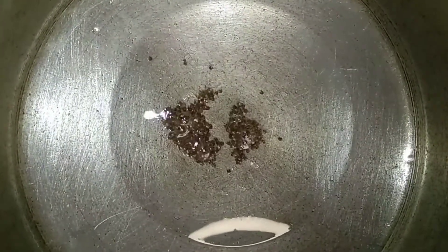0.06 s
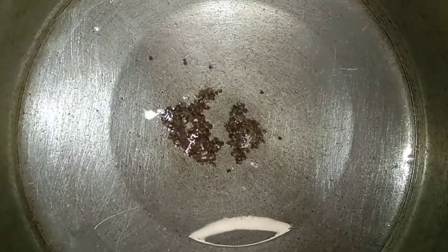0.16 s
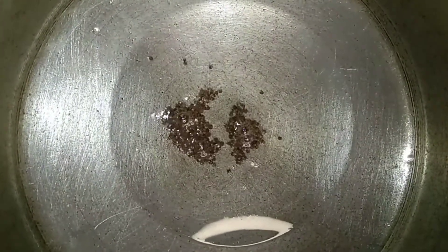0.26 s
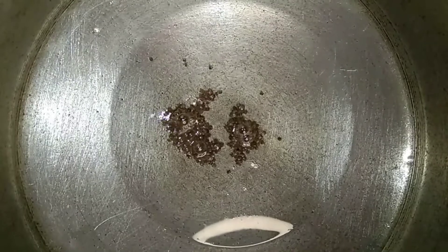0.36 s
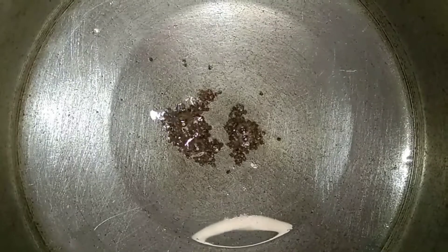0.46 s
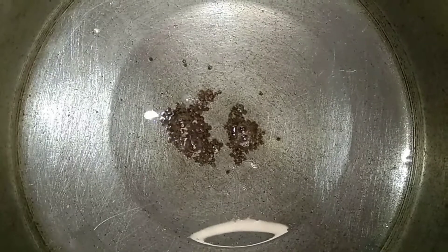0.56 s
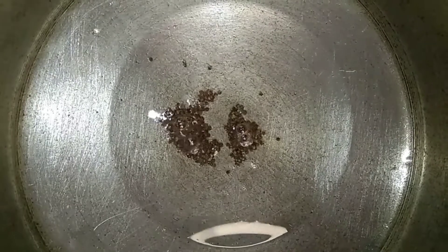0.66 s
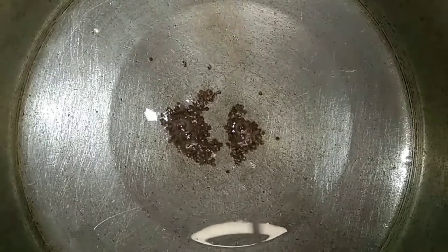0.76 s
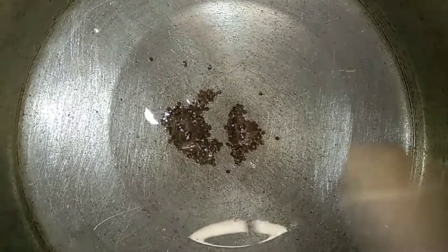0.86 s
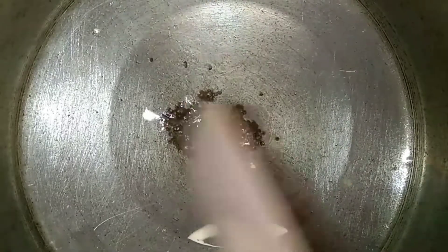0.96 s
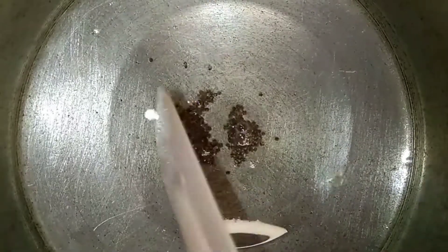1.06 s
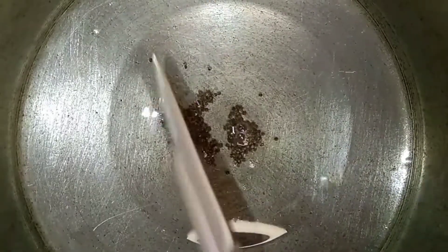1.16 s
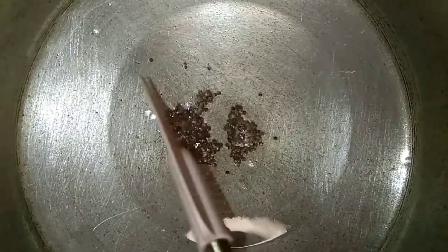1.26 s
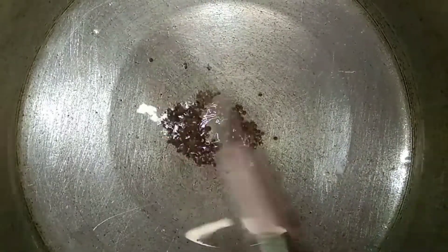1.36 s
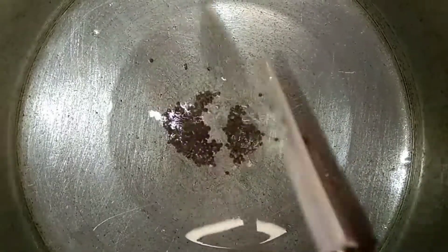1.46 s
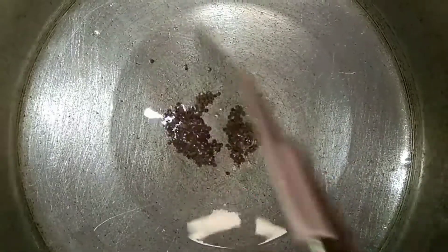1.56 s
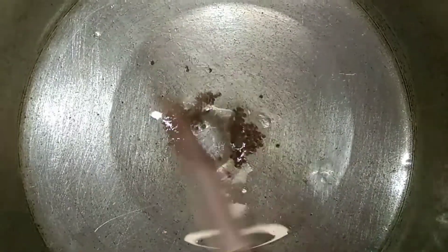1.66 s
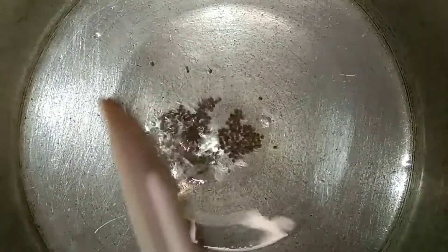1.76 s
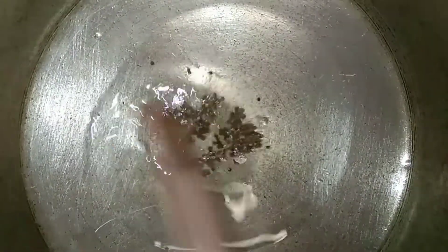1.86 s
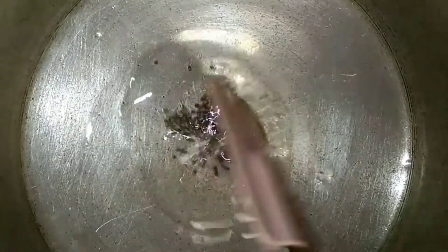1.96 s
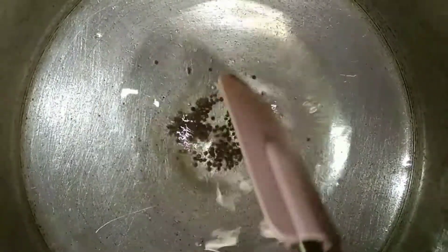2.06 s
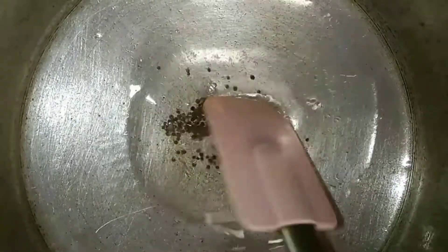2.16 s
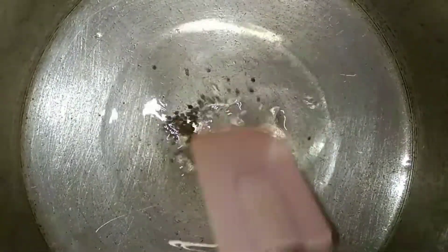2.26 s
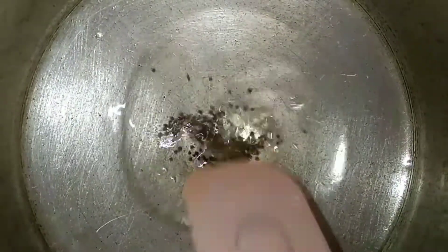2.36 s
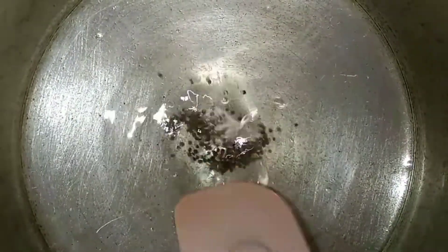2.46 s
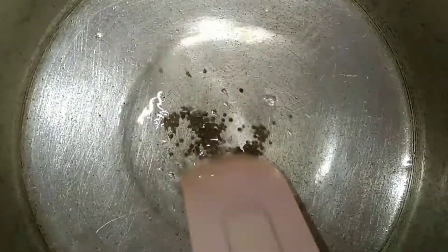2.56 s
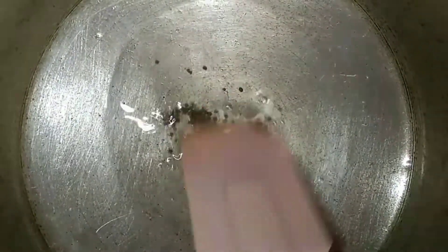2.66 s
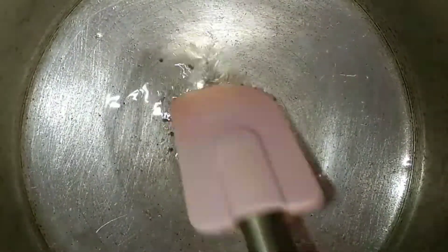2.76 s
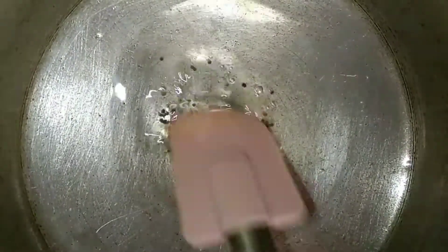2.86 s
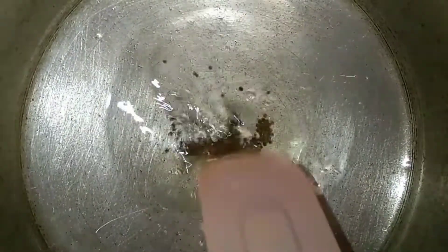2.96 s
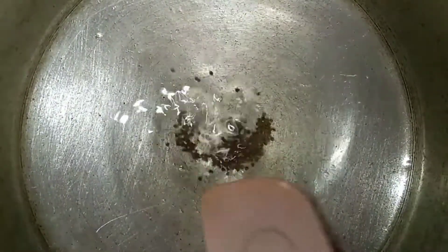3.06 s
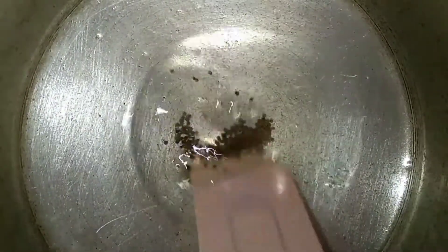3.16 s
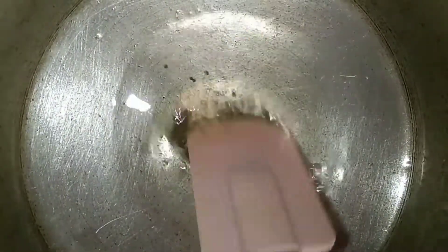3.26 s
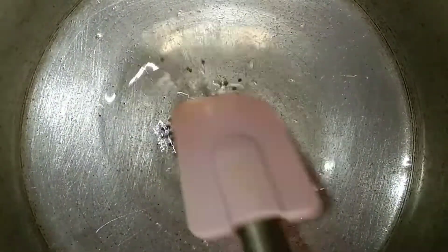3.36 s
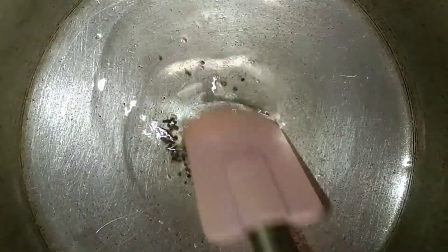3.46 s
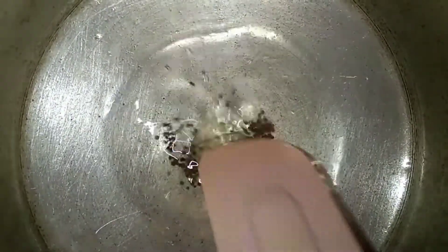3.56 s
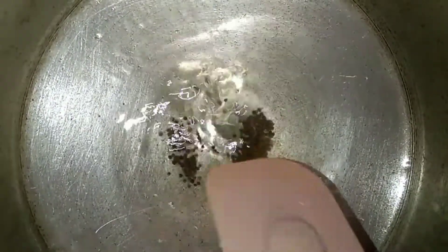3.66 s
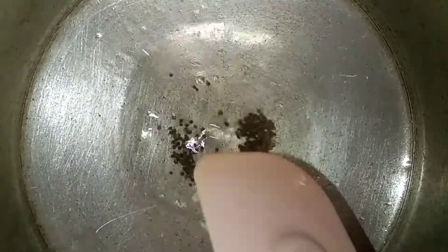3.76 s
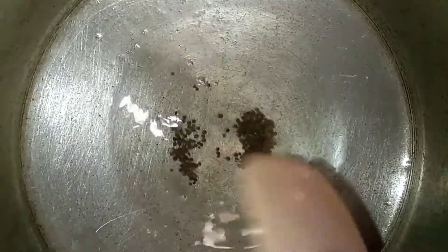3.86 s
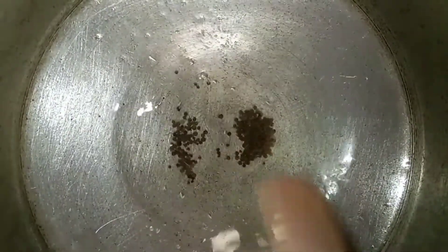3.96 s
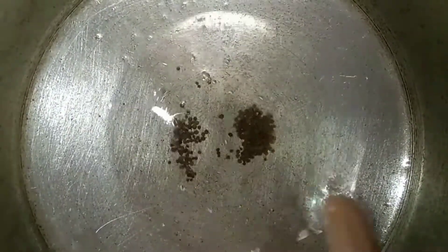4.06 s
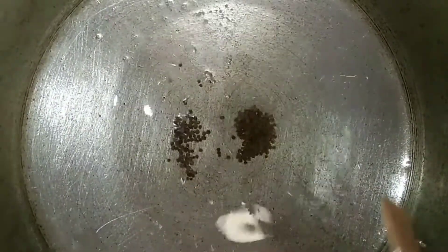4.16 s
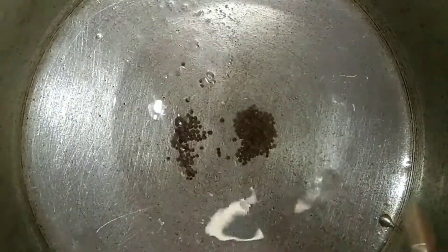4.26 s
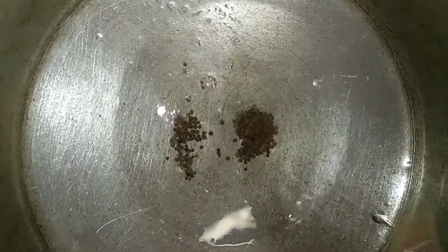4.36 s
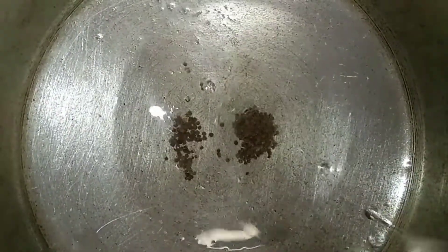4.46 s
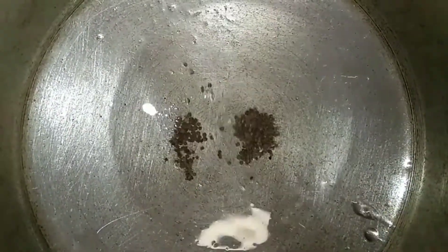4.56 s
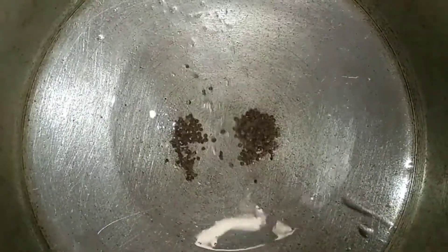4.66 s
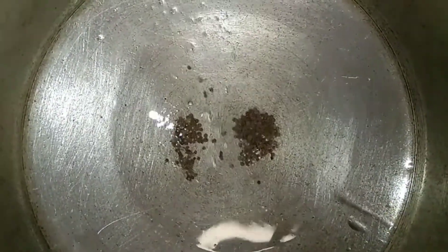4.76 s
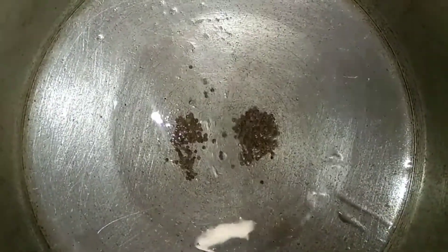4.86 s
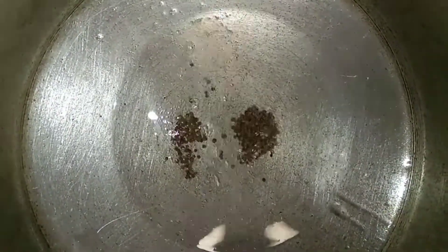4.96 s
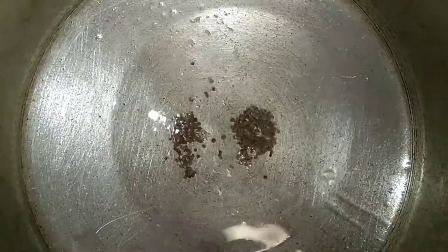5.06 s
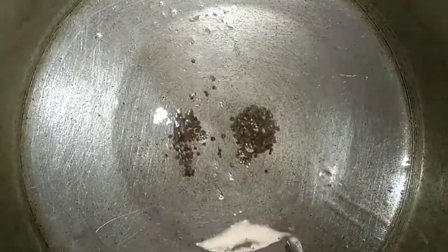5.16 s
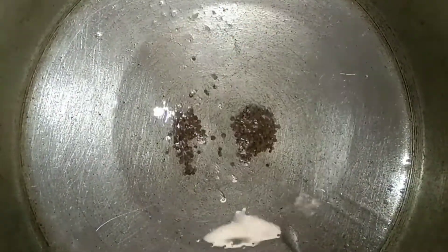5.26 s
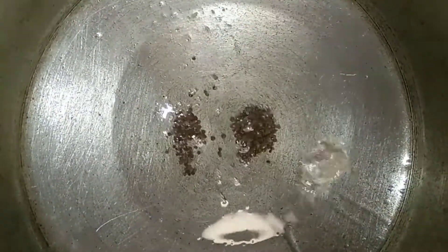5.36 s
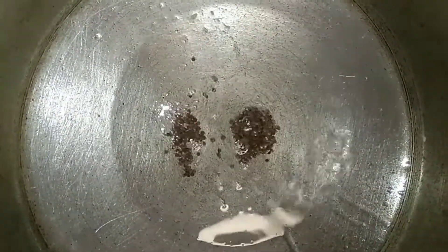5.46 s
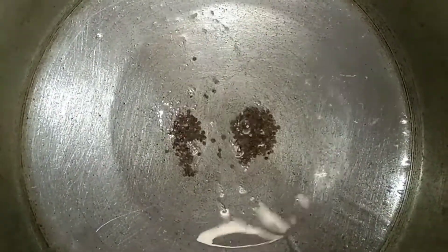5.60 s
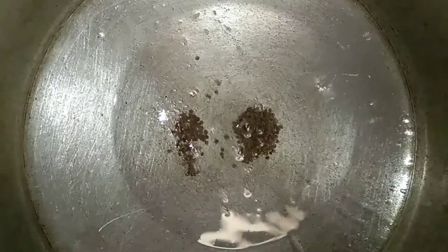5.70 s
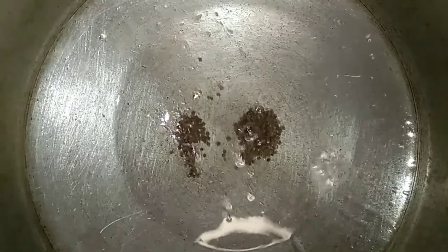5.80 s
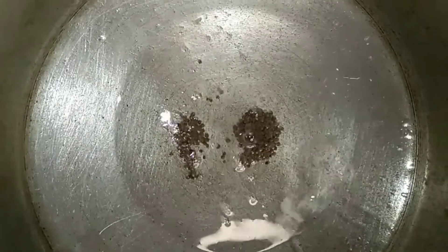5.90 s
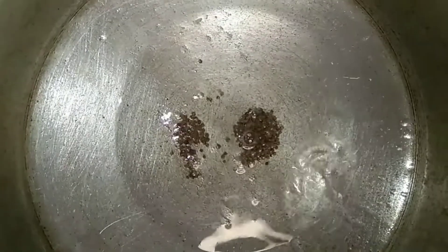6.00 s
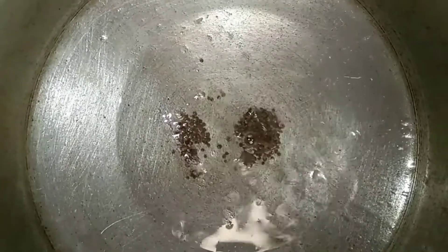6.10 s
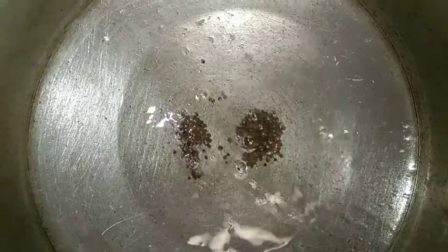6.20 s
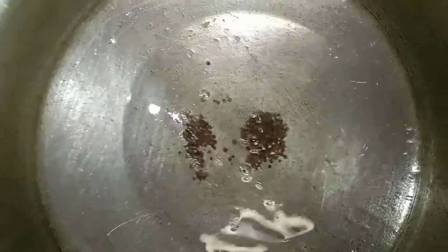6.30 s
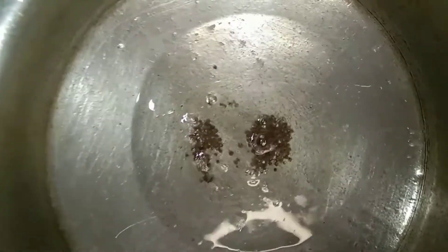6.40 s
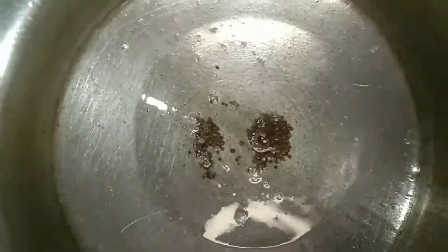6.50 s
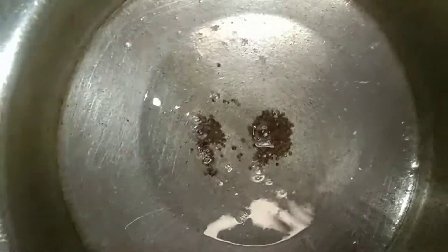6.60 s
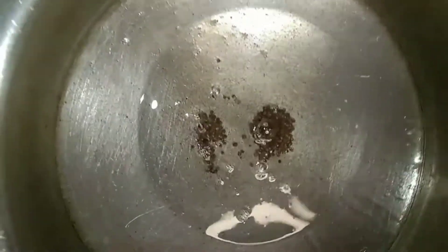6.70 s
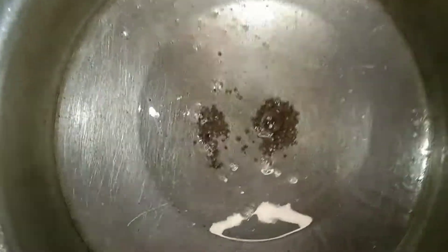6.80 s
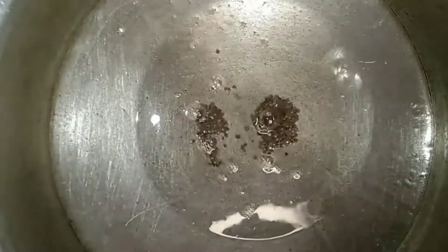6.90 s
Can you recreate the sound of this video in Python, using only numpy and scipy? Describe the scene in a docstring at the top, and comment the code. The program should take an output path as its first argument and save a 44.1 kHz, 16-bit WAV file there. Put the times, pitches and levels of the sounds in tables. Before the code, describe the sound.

Mustard seeds heat in oil in a steel pan, heard close up in a small kitchen. Quiet sizzle and a few faint ticks open, then sharp snaps knock the metal. A soft spatula gives a brief low rumble midway. Snaps strengthen around four seconds, then bubbles blip and pop densely, with one very loud crack near six seconds, above a low, steady stove rush.

```python
"""Mustard seeds heat in a little oil in a steel pan: their coats snap as noise cracks that knock the pan.
Steam bubbles tear the oil film and ring as rising sines; larger pockets plop, low and hollow.
Beneath, a fine sizzle of random spits comes and goes, and blips of tiny bubbles simmer.
A soft spatula adds a little low rumble, over the steady filtered-noise rush of the stove.
The microphone is close to the pan, in a small kitchen."""
import sys
import numpy as np
from scipy import signal
from scipy.fft import rfft, irfft, next_fast_len
from scipy.io import wavfile

SR = 44100
rng = np.random.default_rng(int(sys.argv[2]) if len(sys.argv) > 2 else 0)


def transcribe(u):
    """Save the signal u as a 16-bit wav file named by the first command-line argument.

    u: samples, shape (n,) or (channels, n), limited to [-1, 1]; the rate is SR.
    q: integer samples, one column per channel.
    """
    v = np.clip(np.atleast_2d(u).T, -1, 1)
    q = np.round(v * 32767).astype(np.int16)
    wavfile.write(sys.argv[1], SR, q)


N = 306009
TIME = np.arange(N) / SR  # seconds
AGE = np.arange(SR // 4) / SR  # seconds since the start of one event


def amp(db):
    """Decibels to gain."""
    return 10 ** (np.asarray(db) / 20)


def unit(x):
    """Scaled to rms 1."""
    return x / np.sqrt(np.mean(x ** 2) + 1e-20)


def packet(x):
    """Scaled to energy 1."""
    return x / (np.linalg.norm(x) + 1e-12)


def along(points, hz):
    """(Hz, value) points read on a log frequency axis."""
    point_hz, values = np.transpose(points)
    return np.interp(np.log(hz + 1), np.log(point_hz), values)


def fade(t, t60):
    """Exponential decay, 60 dB in t60 seconds."""
    return np.exp(-np.log(1000) * t / t60)


def coloured(x, spectrum, modes=()):
    """x through a causal minimum-phase filter: a smooth spectrum with resonances and notches on top."""
    size = 2 * next_fast_len(len(x))
    f = np.fft.rfftfreq(size, 1 / SR)
    level_db = along(spectrum, f)
    for hz, width, db in modes:
        level_db = level_db + db / (1 + (2 * (f - hz) / width) ** 2)
    # folding the cepstrum onto positive time makes the filter causal
    cepstrum = irfft(np.log(amp(level_db)))
    cepstrum[1:size // 2] *= 2
    cepstrum[size // 2 + 1:] = 0
    response = np.exp(rfft(cepstrum))
    return irfft(rfft(x, size) * response, size)[:len(x)]


def burst(t60, spray):
    """A sudden crack, one impulse, with a short decaying spray of noise."""
    x = spray * packet(rng.standard_normal(len(AGE)) * fade(AGE, t60))
    x[0] += 1
    return x


def add(track, s, sound):
    """Mix a sound into the track at time s."""
    part = track[max(round(s * SR), 0):][:len(sound)]
    part += sound[:len(part)]


def specks(rate, spread_db):
    """Random impulses of very unequal size, rate per second on average, rms 1."""
    sizes = amp(spread_db * np.minimum(rng.standard_normal(N), 2))
    present = rng.random(N) < rate / SR
    return unit(sizes * present * rng.choice([-1, 1], N))


def scattered(start, end, count):
    """Irregular times, spread over the whole stretch."""
    return start + (np.arange(count) + rng.random(count)) * (end - start) / count


# How long the kitchen rings on. Each row: frequency in Hz, t60 in seconds.
KITCHEN_DECAY = [(300, 0.18), (3000, 0.23), (7000, 0.11), (15000, 0.063)]


def echoes(x, bounce=0.14, bounce_s=.00139, bowl_db=-4, bowl_t60=0.046, room_db=-8):
    """Direct sound, a bounce off the pan's floor, a quick scatter between its walls, then the kitchen."""
    bowl = rng.standard_normal(len(AGE)) * fade(AGE, bowl_t60) * (AGE > bounce_s)
    # kitchen tail: noise whose bands die away at their own rates
    hz, t, bands = signal.stft(rng.standard_normal(len(AGE)), SR, nperseg=256)
    decays = fade(t, along(KITCHEN_DECAY, hz)[:, None])
    room = signal.istft(bands * decays, SR, nperseg=256)[1][:len(AGE)]
    room = room * (AGE > .005)
    response = amp(bowl_db) * packet(bowl) + amp(room_db) * packet(room)
    response[0] += 1
    response += bounce * np.pad(response, (round(bounce_s * SR), 0))[:len(AGE)]
    return signal.fftconvolve(x, packet(response))[:len(x)]


# Tone of the stove's rush. Each row: frequency in Hz, relative density in dB per Hz.
STOVE_SPECTRUM = [(25, -14), (48, 1.5), (80, 2.5), (160, -7.5), (300, -5), (550, -9.5), (1000, -15),
                  (2000, -28), (6500, -34.5), (9000, -46.5), (16000, -44.5)]


def stove(level_db=-53, drone_db=-65, drone_hz=256, width_hz=7):
    """The steady rush of the stove as shaped noise, with a faint wavering drone of narrow-band noise."""
    rush = unit(coloured(rng.standard_normal(N), STOVE_SPECTRUM))
    resonance = signal.iirpeak(drone_hz, drone_hz / width_hz, SR)
    drone = unit(signal.lfilter(*resonance, rng.standard_normal(N)))
    return amp(level_db) * rush + amp(drone_db) * drone


# Strokes of the spatula. Each row: centre in seconds, length in seconds, rumble level in dB.
STROKES = [(3.011, 0.1, -42), (3.326, 0.31, -44)]


def stirring():
    """Low, lumpy rumble that swells and fades with each stroke of the spatula."""
    low = [(25, -32), (50, 1.5), (75, 1.0), (130, -7), (300, -46), (1000, -80)]  # Hz, relative dB
    rumble = unit(coloured(rng.standard_normal(N), low))
    strokes = sum(amp(db) * np.exp(-(2 * (TIME - s) / length) ** 2) for s, length, db in STROKES)
    return rumble * strokes


# Spells in which moisture fries in the oil.
# Each row: time of full strength in seconds, length held in seconds, relative level in dB.
FRYING_SPELLS = [(.88, .47, -60), (1.749, .2, -64), (3.759, .62, -59), (5.54, .9, -54)]
SPELL_ATTACK_S, SPELL_T60_S = 0.052, .7  # rise before full strength, release after the hold
IDLE_DB = -80.5  # relative level of the frying between spells
FLARE_DB, FLARE_T60_S = -52.5, 0.87  # juice freed by a listed snap fries too: level over its click, decay


def frying():
    """How hard the moisture fries, as a gain: a few spells, and a dying flare after each listed snap."""
    power = np.full(N, amp(IDLE_DB) ** 2)
    for s, length, db in FRYING_SPELLS:
        rise = np.clip((TIME - s) / SPELL_ATTACK_S + 1, 0, 1)
        release = fade(np.maximum(TIME - s - length, 0), SPELL_T60_S)
        power += (amp(db) * rise * release) ** 2
    for s, db, _ in LOUD_SNAPS:
        flare = amp(db + FLARE_DB) * fade(TIME[:SR], FLARE_T60_S)
        add(power, s, flare ** 2)
    return np.sqrt(power)


# Tone of a crack or spit, shared by sizzle and snaps. Each row: frequency in Hz, relative density in dB per Hz.
CRACK_SPECTRUM = [(200, -12.5), (1500, -18.5), (2500, -8.5), (4400, -4.5), (5450, 2.5), (6500, -1),
                  (8600, -15.5), (10500, -19.5), (12200, -23), (14500, -13), (16500, -43)]


def sizzle(level_db=-1.5):
    """Countless tiny, bright spits of moisture: random impulses that follow the frying."""
    spits = unit(coloured(specks(rate=350, spread_db=8), CRACK_SPECTRUM))
    return echoes(spits * frying() * amp(level_db))


# Strength of the simmering around the seeds. Each row: time in seconds, relative level in dB.
SIMMER_LEVEL = [(3.3, -71.5), (3.85, -57.5), (4.2, -59.5), (4.76, -64), (5.41, -55), (5.52, -46.5),
                (6.24, -46), (6.74, -61), (6.94, -48)]
SIMMER_GROWS_DB_PER_S = 4  # before the first row, while the oil is still heating up


def boiling():
    """How hard the oil simmers, as a gain; it dies away towards the cooler beginning."""
    s, db = np.transpose(SIMMER_LEVEL)
    cooler_db = SIMMER_GROWS_DB_PER_S * np.maximum(s[0] - TIME, 0)
    return amp(np.interp(TIME, s, db) - cooler_db)


def cavity(hz, cycles, rise, swell):
    """An open bubble rings, 60 dB down in so many cycles; its pitch shoots up as the hole widens."""
    closed = np.exp(-AGE * hz / swell)
    pitch = hz * (1 - rise * closed)
    tone = np.sin(2 * np.pi * np.cumsum(pitch) / SR)
    return packet(tone * (1 - closed) * fade(AGE, cycles / hz))


def simmer(level_db=-2.5, low_hz=4600, high_hz=7200, count=9):
    """Tiny steam bubbles of many sizes, each a separate short blip."""
    pips = np.zeros(N)
    for hz in np.geomspace(low_hz, high_hz, count):
        bursts = specks(rate=14, spread_db=6)
        blip = cavity(hz, cycles=16, rise=.15, swell=2)
        pips += signal.oaconvolve(bursts, blip)[:N]
    return echoes(unit(pips) * boiling() * amp(level_db))


# Tone of the kick into the pan. Each row: frequency in Hz, relative density in dB per Hz.
KNOCK_SPECTRUM = [(100, -30.5), (350, -1.5), (850, 3.5), (1800, -6.5), (2600, -2.5), (3700, 0.5),
                  (5000, -7), (9000, -32)]
# Resonances of the pan, and the notches between them. Each row: frequency in Hz, width in Hz, boost in dB.
PAN_MODES = [(530, 130, 4), (645, 80, -10), (770, 140, 8), (1080, 90, -5), (1270, 240, 4), (2230, 170, 5)]


def knock():
    """A burst kicks the pan, which rings briefly, damped by the oil."""
    kick = burst(t60=.03, spray=.6)
    return packet(coloured(kick, KNOCK_SPECTRUM, PAN_MODES))


def small_bubbles(over_db=33, low_hz=3800, high_hz=8000, db_per_octave=-2, tear_db=-2, knock_db=-19, count=34):
    """Middling bubbles burst at random once the oil is hot; the larger, the lower and louder."""
    track, strength, thud = np.zeros(N), boiling(), knock()
    times = scattered(3.4, N / SR, count)
    for s, smallness in zip(times, np.sqrt(rng.random(count))):
        hz = low_hz * (high_hz / low_hz) ** smallness
        around = [(hz / 4, -24), (hz, 0), (hz * 2, -26)]
        tear = packet(coloured(burst(t60=0.016, spray=1.1), around))
        ring = cavity(hz, cycles=52, rise=0.22, swell=2.3)
        pip = ring + amp(tear_db) * tear + amp(knock_db) * thud
        size_db = over_db + db_per_octave * np.log2(hz / low_hz)
        add(track, s, np.interp(s, TIME, strength) * amp(size_db) * pip)
    return echoes(track)


# Low, hollow plops. Each row: start in seconds, relative energy in dB, settled pitch in Hz.
LOW_PLOPS = [(0.1, -20.5, 1250), (.272, -24.5, 630), (.288, -28.5, 1140), (2.934, -17, 785),
             (4.757, -16.5, 533), (5.103, -15, 840), (5.4015, -4, 820), (6.73, -22.5, 1165)]


def plops():
    """Larger pockets in the oil ring low and hollow, with some knock of the pan."""
    track = np.zeros(N)
    for s, db, hz in LOW_PLOPS:
        plop = cavity(hz, cycles=11.0, rise=0.042, swell=0.1) + 0.37 * knock()
        add(track, s, amp(db) * echoes(plop))
    return track


# The loudest bubbles, with some broad dull pops and one dull snap (at 5.3554 s).
# Each row: start in seconds, relative ring energy in dB, relative knock energy in dB, settled pitch in Hz.
BUBBLES_AND_DULL_POPS = [(0.0984, -27, -31.5, 2900), (0.6934, -29, -50.5, 5590), (1.99, -5, -20.5, 3780),
                         (2.7633, -21, -49.5, 7340), (3.1643, -24.5, -18, 3800), (3.4094, -23, -42, 6530),
                         (3.6697, -20.5, -49, 6420), (4.1188, -18.5, -14.5, 2560),
                         (4.269, -12, -45.5, 5700), (4.6241, -23, -13.5, 2130), (4.7132, -9.5, -38, 3180),
                         (4.8452, -24.5, -19.5, 2680), (4.9035, -26, -11.5, 2550),
                         (4.9395, -11, -22.5, 3800), (4.9466, -14, -42, 3920), (4.9669, -13, -48, 6040),
                         (5.1134, -9, -33, 4920), (5.1549, -26, -18.5, 2820), (5.2096, -29, -18.5, 3940),
                         (5.3217, -10, -43, 4940), (5.3554, 0, -1, 5550), (5.389, -12, 0, 3340),
                         (5.5646, -7.5, -23, 4270), (5.6931, -11.5, -41, 3960),
                         (5.7177, -14.5, -17.5, 5630), (5.8126, -6, -7, 5590), (5.889, -16.5, -46.5, 5760),
                         (5.98, -11, -45, 4610), (6.0847, -7, -19, 4700), (6.1741, -9.5, -21, 3730),
                         (6.2418, -9, -17.5, 2285), (6.251, -10.5, -42, 3010), (6.3108, -10, -36, 2485),
                         (6.4562, -12, -11.5, 3830), (6.5351, -10, -49, 4300), (6.6106, -9.5, -8.5, 2840),
                         (6.8903, -9.5, -15, 2540)]


def bubbles_and_dull_pops(tear_db=-6, knock_db=-1):
    """A soft tick, as of tearing oil film, and a cavity that rings for a different time in each row."""
    track = np.zeros(N)
    lives = rng.uniform(28, 52, len(BUBBLES_AND_DULL_POPS))  # ringing time in cycles
    for (s, db, push_db, hz), life in zip(BUBBLES_AND_DULL_POPS, lives):
        around = [(hz / 4, -26), (hz * 0.82, -6), (hz, 0), (hz * 1.285, -6), (hz * 1.6, -24), (hz * 4, -42)]
        tear = packet(coloured(burst(t60=0.049, spray=4.5), around))
        pip = cavity(hz, cycles=life, rise=.2, swell=2.2) + amp(tear_db) * tear
        add(track, s, echoes(amp(db) * pip + amp(push_db + knock_db) * knock()))
    return track


def small_snaps(over_db=38, spread_db=6, knock_db=-15, busy_db=-61, count=64):
    """Faint snaps at random moments, crowding where the frying is strong and following its level."""
    track, strength, thud = np.zeros(N), frying(), knock()
    odds = np.cumsum(np.minimum(strength, amp(busy_db)))  # above busy_db they crowd no further
    times = np.interp(scattered(0, 1, count), odds / odds[-1], TIME)
    for s, weakness in zip(times, rng.random(count)):
        crack = packet(coloured(burst(t60=0.018, spray=0.74), CRACK_SPECTRUM))
        gain = np.interp(s, TIME, strength) * amp(over_db - spread_db * weakness)
        add(track, s, gain * (crack + amp(knock_db) * thud))
    return echoes(track)


# The loudest snaps of seeds and spitting oil.
# Each row: start in seconds, relative click energy in dB, relative knock energy in dB.
LOUD_SNAPS = [(0.9936, -26, -26), (1.055, -20, -19), (1.1024, -23.5, -23), (1.2527, -21.5, -37.5),
              (1.3033, -17.5, -23), (1.3547, -9, -19), (1.507, -22, -46.5), (1.799, -14, -26),
              (2.011, -8.5, -19), (2.3873, -18.5, -32.5), (2.6599, -20.5, -33.5), (2.9145, -21, -40),
              (3.2034, -19, -21), (3.256, -19, -14), (3.5255, -16.5, -16.5), (3.58, -17, -12.5),
              (3.7107, -5, -18), (3.805, -18.5, -28.5), (3.8763, -25.5, -16.5), (3.9718, -3.5, -10),
              (4.2549, -13.5, -36.5), (4.2934, 2.5, -9.5), (4.3444, -9, -12), (4.3594, -9.5, -34),
              (4.5067, -21, -26), (4.582, -23.5, -41.5), (5.4176, -15, -13), (5.4956, -16, -35),
              (5.5848, -8.5, -16), (5.7745, -23, -18.5), (5.9434, -22, -17.5), (5.986, 10, 5),
              (6.039, -8.5, -29), (6.1475, -18.5, -18), (6.7206, -22, -27)]


def snaps(click_db=1, knock_db=-1, dulling=0.44, typical_db=-14, treble_hz=11000):
    """Each snap is a sharp crack that also knocks the pan; big ones have less treble."""
    track = np.zeros(N)
    for s, db, push_db in LOUD_SNAPS:
        treble_db = -dulling * max(db - typical_db, 0)
        colour = [(hz, level + treble_db * (hz > treble_hz)) for hz, level in CRACK_SPECTRUM]
        crack = packet(coloured(burst(t60=0.0099, spray=0.3), colour))
        add(track, s, echoes(amp(db + click_db) * crack + amp(push_db + knock_db) * knock()))
    return track


def scene():
    """Everything at one microphone above the pan."""
    background = stove() + stirring() + sizzle() + simmer()
    pops = small_bubbles() + plops() + bubbles_and_dull_pops() + small_snaps() + snaps()
    return (background + pops)[None]


def record(dry, ceiling=.75, top_hz=15800):
    """Soft limit on the very loudest peaks, then a steep low-pass at top_hz."""
    rounded = ceiling * np.tanh(dry / ceiling)
    low_pass = signal.ellip(10, .1, 80, top_hz, fs=SR, output="sos")
    return signal.sosfilt(low_pass, rounded)


dry = scene()
out = record(dry)
transcribe(out)
```